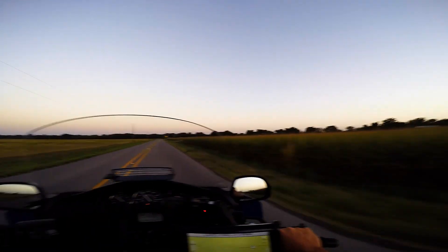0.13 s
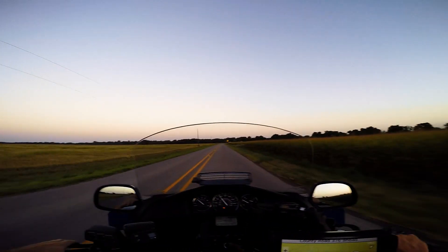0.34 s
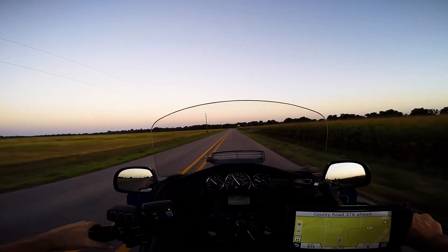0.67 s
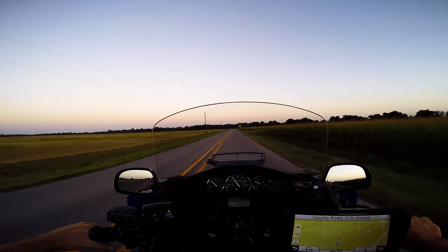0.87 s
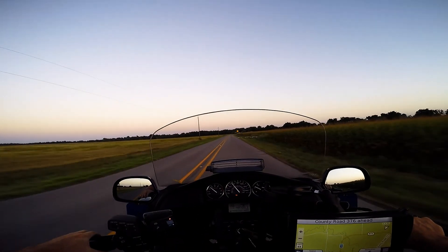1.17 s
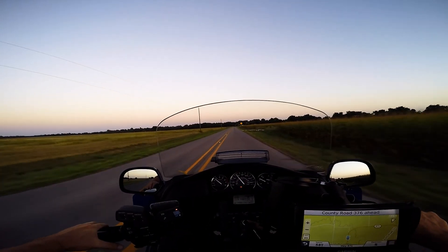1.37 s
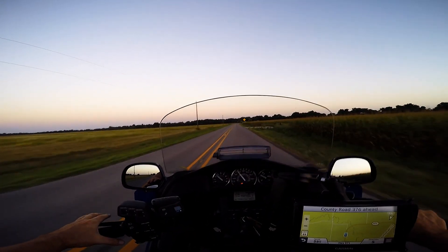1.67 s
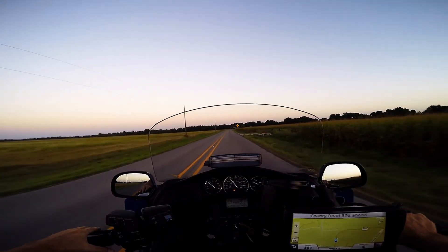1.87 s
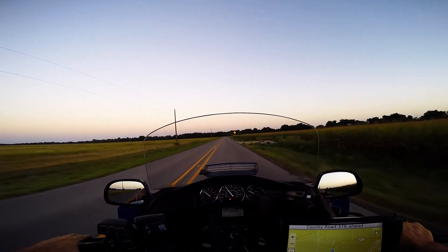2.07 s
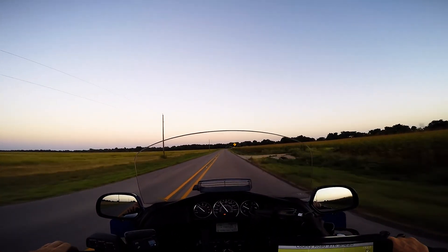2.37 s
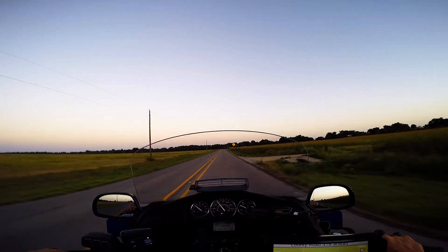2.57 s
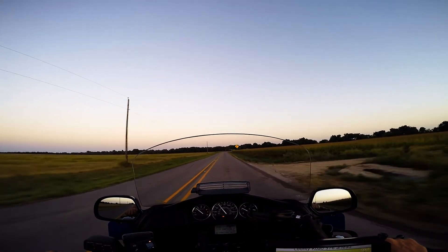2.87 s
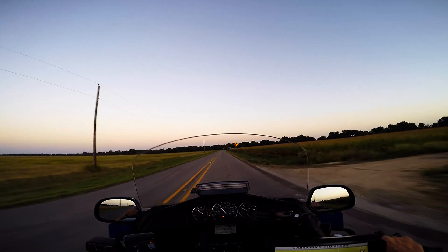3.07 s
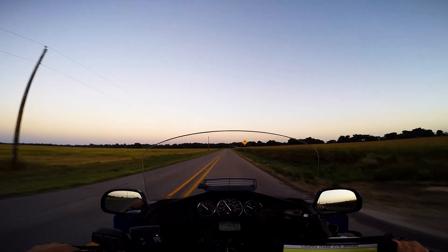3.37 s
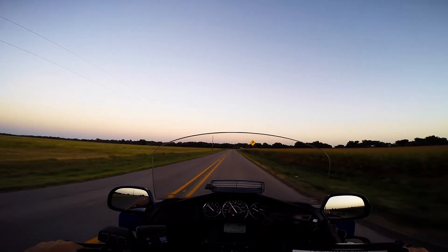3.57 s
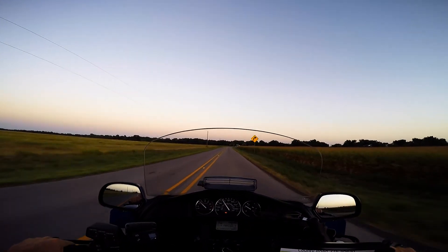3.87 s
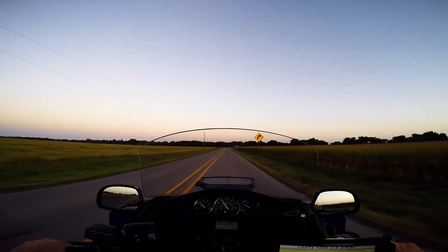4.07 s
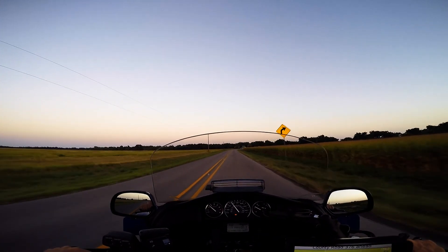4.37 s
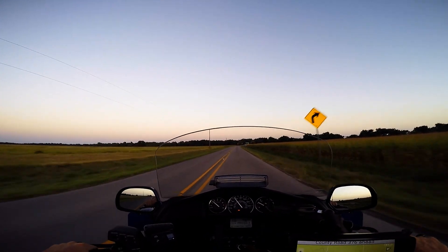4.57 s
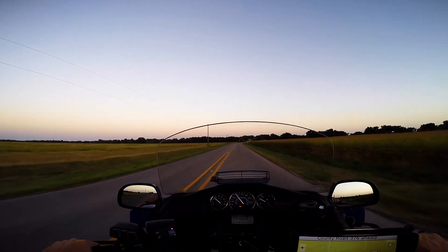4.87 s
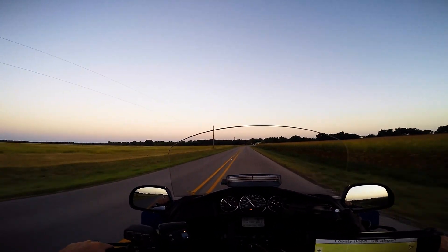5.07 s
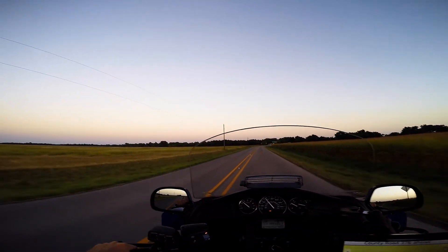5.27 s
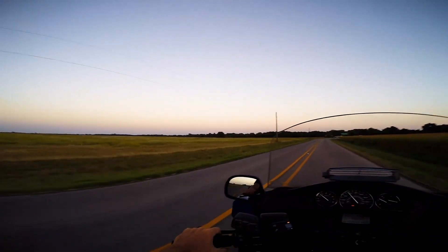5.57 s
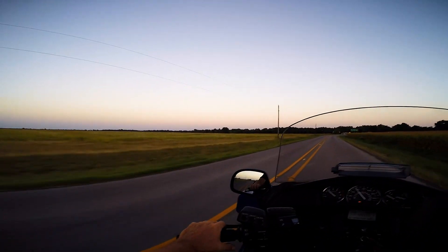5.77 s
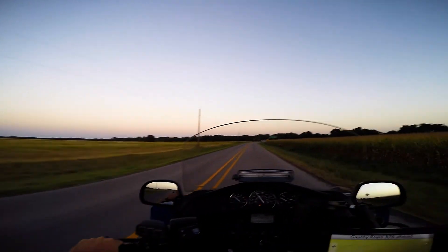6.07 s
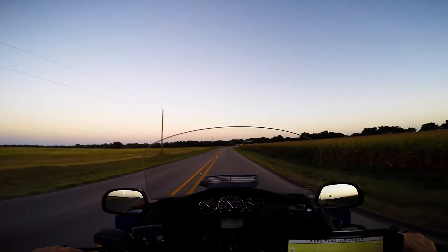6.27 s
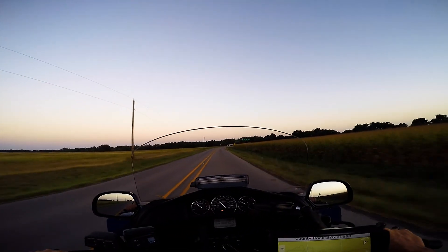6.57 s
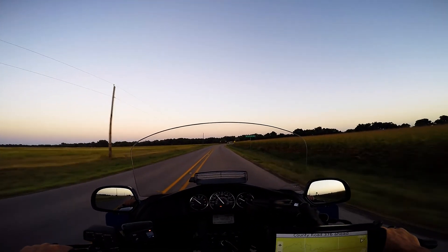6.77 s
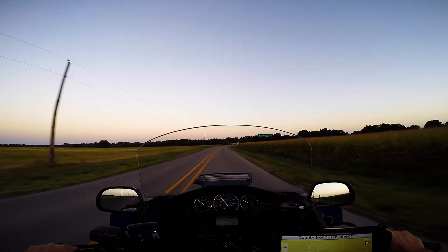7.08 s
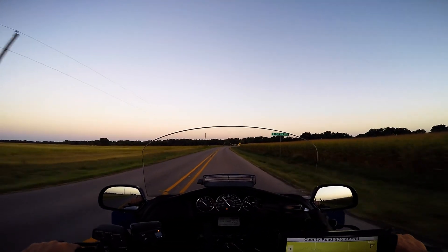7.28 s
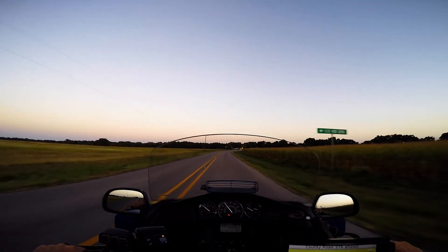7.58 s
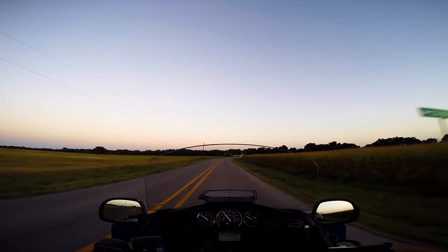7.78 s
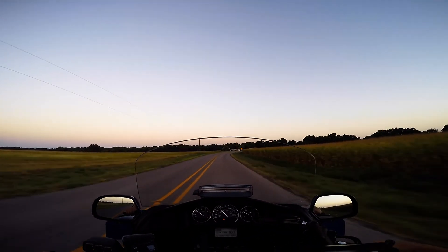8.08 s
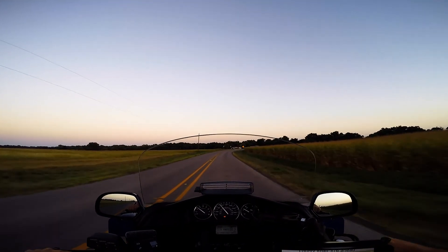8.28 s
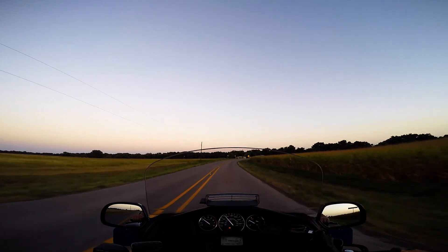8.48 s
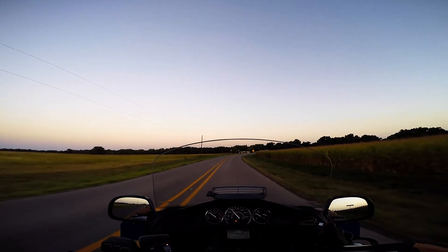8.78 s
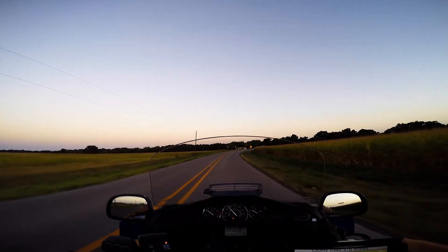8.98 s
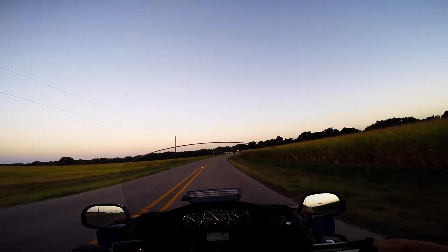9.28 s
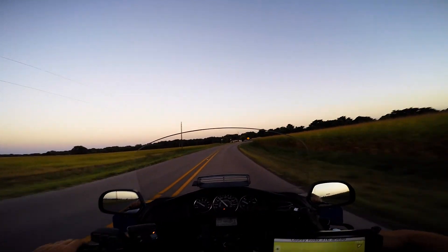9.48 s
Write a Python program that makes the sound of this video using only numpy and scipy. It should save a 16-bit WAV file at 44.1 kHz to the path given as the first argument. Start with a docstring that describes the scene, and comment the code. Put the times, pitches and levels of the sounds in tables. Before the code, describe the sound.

Heard from on board and almost entirely in the right channel, a motorcycle trike rolls along a road at steady speed, its engine and tyre noise carrying a faint whine. Wind rumbles and thumps irregularly on the microphone throughout, hardest around the middle. Three short spells of connector crackle interrupt, the first and last with split-second dropouts. The ride noise softens a little at the end, over faint electronic hiss.

```python
"""On a cruising three-wheeled motorcycle, one microphone close behind the windscreen.
From the start, eddies off the screen buffet it over a rush of engine, tyres and air with faint gear
whines. It feeds the right input through a loose plug; the left gets only leakage and circuit noise.
The plug crackles and cuts out near 1.6 s, crackles at 4.4 s amid the hardest buffets, and cuts out
again near 6.6 s. Towards the end the whines sink a little and the rush eases."""
import sys
import numpy as np
from scipy import signal
from scipy.fft import rfft, irfft, next_fast_len
from scipy.io import wavfile
from scipy.ndimage import uniform_filter1d

SR = 44100
rng = np.random.default_rng(int(sys.argv[2]) if len(sys.argv) > 2 else 0)


def output_pcm(signal):
    """Save a mono or channel-first signal as 16-bit PCM at the path in sys.argv[1].

    Samples are clipped to [-1, 1] before scaling.
    """
    pcm = np.clip(np.atleast_2d(signal).T, -1, 1) * 32767
    wavfile.write(sys.argv[1], SR, np.round(pcm).astype(np.int16))


N = 425124

# Strength of the airflow at the capsule, ahead of the input gain: t/s, level/dB
AIRFLOW_LEVEL = [(0.0, -50.5), (0.35, -33.5), (0.8, -42.5), (1.8, -43), (2.31, -37.5), (2.55, -43),
                 (3.95, -44.5), (4.19, -38), (4.4, -44.5), (5.02, -38), (5.4, -51.5), (6.04, -43),
                 (7.1, -42.5), (7.43, -36.5), (7.7, -45.5), (8.8, -43.5), (9.13, -39.5), (9.35, -54.5),
                 (9.64, -44)]


def amp(db):
    """Decibels to gain."""
    return 10 ** (np.asarray(db) / 20)


def unit_rms(x):
    """Scale to unit rms."""
    return x / np.sqrt(np.mean(x ** 2) + 1e-20)


def in_time(rows):
    """The columns after t/s of a curve table, one value a sample."""
    s, *columns = np.transpose(rows)
    return [np.interp(np.arange(N) / SR, s, column) for column in columns]


def drift(rate_hz):
    """Slow random wander of unit rms, drawn every 40 samples."""
    pole = np.exp(-80 * np.pi * rate_hz / SR)
    white = rng.standard_normal(N // 40 + 2002)
    slow = signal.lfilter([1], [1, -2 * pole, pole * pole], white)[2000:]
    return np.interp(np.arange(N) / 40, np.arange(len(slow)), unit_rms(slow))


def resonance(x, hz, width_hz):
    """Two-pole band-pass, gain 1 at its peak."""
    r = np.exp(-np.pi * width_hz / SR)
    feedback = [1, -2 * r * np.cos(2 * np.pi * hz / SR), r * r]
    return signal.lfilter(np.array([1, 0, -1]) * (1 - r * r) / 2, feedback, x)


def patchy_noise(spectrum, shared_db, own_db, rate_hz):
    """Noise of the given colour; octave-wide bands swell together and each on its own."""
    size = next_fast_len(N)
    hz = np.fft.rfftfreq(size, 1 / SR) + 1
    knot_hz, knot_db = np.transpose(spectrum)
    coloured = rfft(rng.standard_normal(size)) * amp(np.interp(np.log(hz), np.log(knot_hz), knot_db))
    together, out = drift(rate_hz), 0
    for octave in range(4, 15):
        share = np.cos(np.pi / 2 * np.clip(np.log2(hz) - octave, -1, 1)) ** 2   # neighbours sum to one
        band = irfft(coloured * share, size)[:N]
        out = out + band * amp(shared_db * together + own_db * drift(2 * rate_hz))
    return unit_rms(out)


def airflow():
    """Lumpy low rumble of air streaming right over the capsule."""
    # Spectrum of the rumble: f/Hz, relative level/dB
    rumble = [(8.8, -11), (15, -20), (38, -3), (64, -4.5), (136, -8), (315, -20), (450, -24), (580, -33),
              (990, -120)]
    level_db, = in_time(AIRFLOW_LEVEL)
    return amp(level_db) * patchy_noise(rumble, shared_db=3.0, own_db=2.5, rate_hz=7.9)


def motorcycle():
    """From on board: a broad rush, road drone, hollow tones and gear whines that follow road speed."""
    # Course of the ride: t/s, lowest whine f/Hz, whine level/dB, rush level/dB
    cruise = [(0, 533, -57, -49.5), (2, 535, -59, -50), (3.5, 534, -61, -50.5), (5, 531, -58.5, -50.5),
              (6.5, 526, -60.5, -51), (7.5, 522, -61.5, -52), (8.2, 520, -71.5, -51.5),
              (9.64, 518, -66, -54)]
    # Spectrum of engine, tyres and air: f/Hz, relative level/dB
    rush_spectrum = [(180, -14), (300, -6), (532, -1), (669, -5), (1190, -3.5), (1440, -8.5), (2100, -12),
                     (3270, -26), (4390, -21.5), (7540, -33), (11900, -32.5), (12900, -35), (13800, -38),
                     (15000, -33)]
    # Steady low road drone (46 Hz) and narrow, hollow bands of ride noise: f/Hz, width/Hz, level/dB
    ride_bands = [(46, 17.5, -51.5), (1161, 90, -61), (1975, 120, -69.5), (2980, 105, -75.5),
                  (4920, 590, -77), (9250, 880, -78.5)]
    # Gear whines: multiple of the lowest whine, relative level/dB
    whines = [(1, -1), (1.645, -5), (2, -22), (3.28, -11)]
    whine_hz, whine_db, rush_db = in_time(cruise)
    out = amp(rush_db) * patchy_noise(rush_spectrum, shared_db=0.62, own_db=1.3, rate_hz=11.0)
    for hz, width_hz, level_db in ride_bands:
        out += amp(level_db) * unit_rms(resonance(rng.standard_normal(N), hz, width_hz))
    cycles = np.cumsum(whine_hz * (1 + 0.00402 * drift(6.0))) / SR
    for multiple, level_db in whines:
        wavering = amp(whine_db + level_db + 2.9 * drift(12.0))
        out += np.sqrt(2) * wavering * np.sin(2 * np.pi * multiple * cycles)
    return out


def circuit_noise(frame_hz=59.94, tick_hz=15000):
    """Camera electronics on both inputs: preamp hiss, thin tones, high sizzle and frame-rate ticks."""
    # Wavering tones of the circuit: f/Hz, level/dB ahead of the left and right gains
    thin_tones = [(6293, -92), (6324, -98), (12618, -85)]
    t = np.arange(N) / SR
    hiss = amp(-69) * signal.lfilter([1, -.15], [1], rng.standard_normal((2, N)))   # gently rising top
    hiss += amp(-51) * resonance(rng.standard_normal((2, N)), 50, 60)   # preamp flicker noise
    tones = sum(np.sqrt(2) * amp(level_db + 2.4 * drift(25.0)) * np.sin(2 * np.pi * hz * t)
                for hz, level_db in thin_tones)
    pulses = np.diff(np.floor((t - .0117) * frame_hz) % 2, prepend=1)   # signs alternate
    pulses *= amp(2.0 * drift(15.0))
    ticks = amp(-35.5) * resonance(resonance(pulses + 1e-18, tick_hz, 800), tick_hz, 800)
    sizzle = amp(-65) * resonance(rng.standard_normal(N), tick_hz, 900)
    return hiss + tones * amp([[-6], [5]]) + (ticks + sizzle) * amp([[0], [2.5]])


def small_eddies(count=45, over_flow_db=5, spread_db=3, typical_ms=15.4, typical_hz=100):
    """Weak eddies ride on the airflow at random moments; rows of t/s, level/dB, length/ms, f/Hz."""
    when, strength, length, pitch = rng.random((count, 4)).T
    s = when * N / SR
    flow_s, flow_db = np.transpose(AIRFLOW_LEVEL)
    level_db = np.interp(s, flow_s, flow_db) + over_flow_db + spread_db * (2 * strength - 1)
    return list(zip(s, level_db, typical_ms * 2 ** (2 * length - 1), typical_hz * 2 ** (pitch - .5)))


def buffets(low_slope=1.08, high_slope=2.41, foam_hz=620):
    """Each eddy hits the capsule as a few ragged cycles of low noise under a bell-shaped swell."""
    # Strong eddies off the windscreen: centre t/s, level/dB, length/ms, centre f/Hz
    strong_eddies = [(0.037, -33.5, 11, 97), (0.222, -31, 23, 106), (0.295, -26.5, 41, 108),
                     (0.36, -31, 7.3, 164), (0.457, -32, 16, 119), (0.526, -31, 18, 119),
                     (0.564, -31, 21, 86), (0.692, -26, 25, 90), (0.737, -34.5, 43, 97),
                     (0.823, -32.5, 14, 93), (0.935, -34, 31, 91), (1.051, -32, 6.6, 126),
                     (1.093, -33.5, 28, 128), (1.262, -34.5, 30, 69), (1.422, -35, 39, 117),
                     (1.651, -32.5, 8.1, 119), (1.74, -35, 16, 114), (1.898, -26, 23, 108),
                     (1.993, -32, 40, 99), (2.13, -31.5, 14, 89), (2.183, -30.5, 55, 106),
                     (2.377, -36.5, 83, 79), (2.74, -23, 9.5, 109), (2.839, -22.5, 19.4, 103),
                     (3.051, -32.5, 12, 120), (3.089, -29.5, 30, 153), (3.153, -26.5, 23, 125),
                     (3.199, -28, 35, 92), (3.365, -30, 19, 151), (3.545, -26, 16, 130),
                     (3.633, -36, 91, 108), (3.942, -31.5, 39, 102), (4.153, -23.5, 15, 107),
                     (4.183, -22, 19, 170), (4.225, -31, 45, 104), (4.365, -31, 16, 135),
                     (4.422, -25, 31, 130), (4.485, -30.5, 29, 106), (4.665, -21, 19.5, 117),
                     (4.692, -24, 12.7, 103), (4.738, -31, 14, 140), (4.88, -32.5, 30, 154),
                     (5.008, -25.5, 25, 111), (5.131, -32, 28, 93), (5.168, -30, 13, 146),
                     (5.306, -32.5, 38, 111), (5.942, -32, 12, 105), (6.039, -22.5, 35, 114),
                     (6.136, -28.5, 15, 94), (6.259, -31, 26, 125), (6.332, -30.5, 30, 141),
                     (6.471, -42, 41, 64), (6.638, -30, 14.5, 98), (6.751, -33.5, 59, 94),
                     (6.795, -32.5, 11, 85), (6.954, -37.5, 14, 93), (7.112, -29, 46, 100),
                     (7.288, -32.5, 46, 124), (7.448, -25, 42, 104), (7.499, -33, 49, 110),
                     (7.666, -35, 45, 95), (7.867, -29.5, 21, 117), (7.924, -31, 16, 122),
                     (7.966, -32, 56, 89), (8.038, -35.5, 14, 103), (8.204, -35.5, 30, 118),
                     (8.515, -30, 27, 121), (8.636, -32, 19, 123), (8.984, -33, 56, 124),
                     (9.16, -33, 51, 127), (9.495, -32.5, 35, 122), (9.563, -35.5, 38, 104)]
    size, eddies = 8192, strong_eddies + small_eddies()
    out = np.zeros(N + size)
    hz = np.fft.rfftfreq(size, 1 / SR)
    ms = (np.arange(size) - size // 2) / SR * 1000
    for s, level_db, length_ms, centre_hz in eddies:
        ratio = hz / centre_hz
        hump = ratio ** low_slope / (1 + ratio ** (low_slope + high_slope))
        eddy = irfft(rfft(rng.standard_normal(size)) * hump, size)
        eddy /= np.sqrt(uniform_filter1d(eddy ** 2, size=700) + 1e-12)   # the swell alone sets the level
        swell = amp(level_db) * amp(-25.0 * (ms / length_ms) ** 2)
        start = round(s * SR) - size // 2
        out[max(start, 0):start + size] += (swell * eddy)[max(-start, 0):]
    foam = signal.butter(2, foam_hz, fs=SR, output="sos")   # the foam cover dulls the edges
    return signal.sosfilt(foam, out[:N])


def loose_plug(mic):
    """An open contact passes little; a scraping one throws a spike, and the bias swings back after it."""
    # Lost contact: from t/s, to t/s, level still passing/dB
    cutouts = [(1.5655, 1.5785, -22), (1.587, 1.6285, -28), (6.5585, 6.571, -12), (6.588, 6.593, -15)]
    # Scrapes of the contact: t/s, spike level/dB
    crackles = [(1.549, -45), (1.5548, -45), (1.5577, -48), (1.5788, -48), (1.6678, -41), (1.7009, -33),
                (1.7263, -45), (4.3538, -39), (4.359, -37), (4.36, -40), (4.4181, -39), (6.5455, -46),
                (6.57, -49), (6.5822, -39), (6.583, -42), (6.5882, -44), (6.593, -39), (6.611, -42),
                (6.6135, -41), (6.715, -44)]
    t, contact = np.arange(N) / SR, np.ones(N)
    for start, end, passing_db in cutouts:
        contact[(t >= start) & (t < end)] = amp(passing_db)
    spikes = np.zeros(N)
    spike_s, spike_db = np.transpose(crackles)
    spikes[np.round(spike_s * SR).astype(int)] = -amp(spike_db)
    clicks = signal.lfilter([1], [1, -.1], spikes)
    bias_swing = amp(29.5) * resonance(spikes + 1e-18, hz=330, width_hz=640)
    return mic * uniform_filter1d(contact, size=40) + clicks + bias_swing


def scene(input_gain_db=5, leak_db=-28.5, leak_hz=170):
    """The microphone goes to the right input and leaks, dulled, into the left."""
    mic = buffets() + airflow() + motorcycle()
    right = amp(input_gain_db) * loose_plug(mic)
    pole = np.exp(-2 * np.pi * leak_hz / SR)
    left = amp(leak_db) * signal.lfilter([1 - pole], [1, -pole], right)
    return np.array([left, right]) + circuit_noise()


def record(dry, low_cut_hz=18, high_cut_hz=15280):
    """A coupling capacitor trims the deepest rumble and a steep filter cuts the top."""
    coupling = signal.butter(1, low_cut_hz, "high", fs=SR, output="sos")
    steep_cut = signal.ellip(12, .5, 70, high_cut_hz, fs=SR, output="sos")
    return signal.sosfilt(steep_cut, signal.sosfilt(coupling, dry))


dry = scene()
out = record(dry)
output_pcm(out)
```